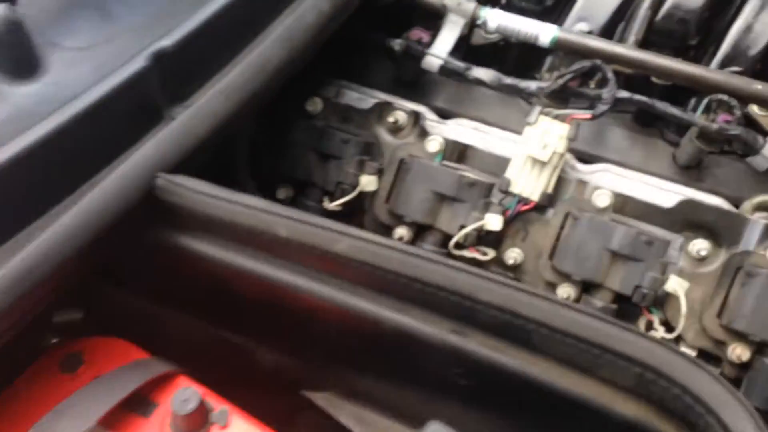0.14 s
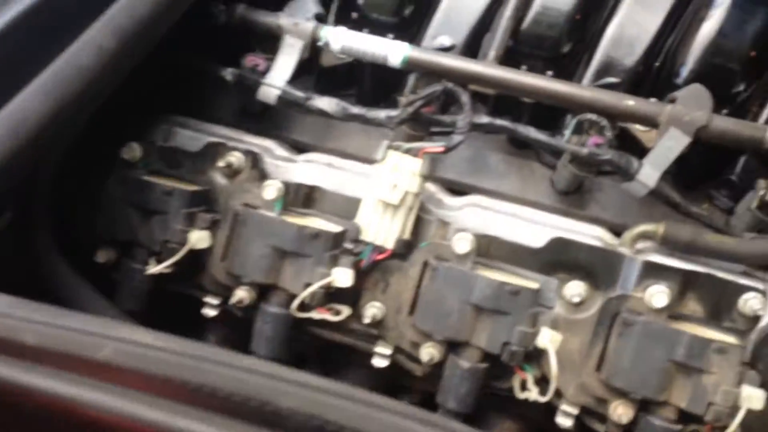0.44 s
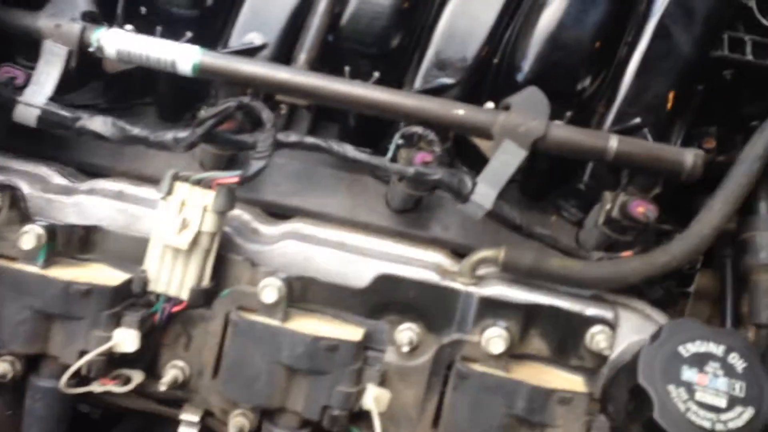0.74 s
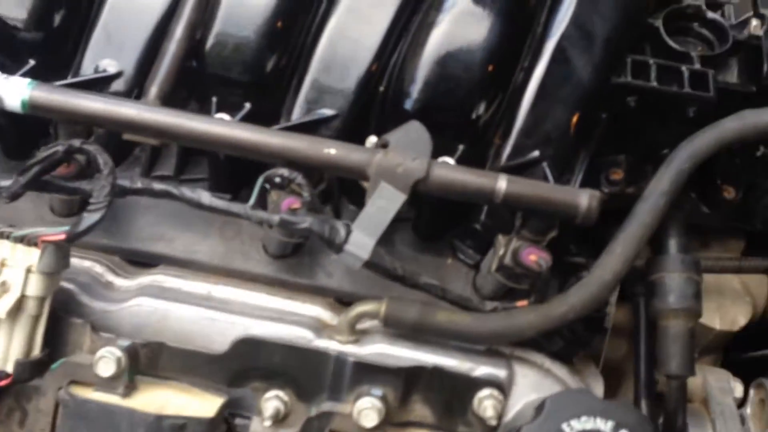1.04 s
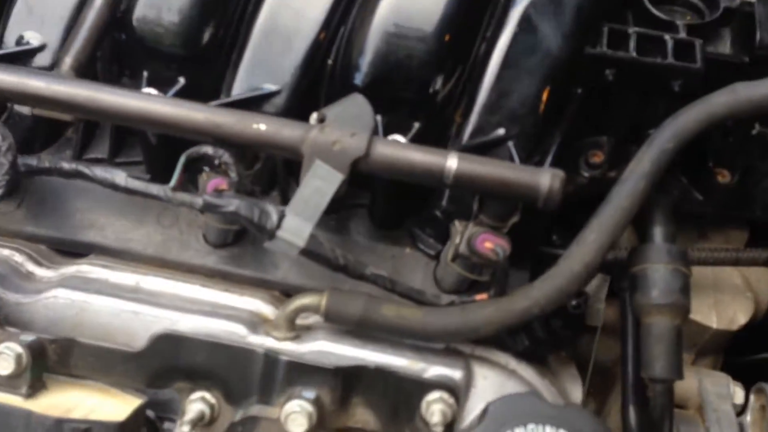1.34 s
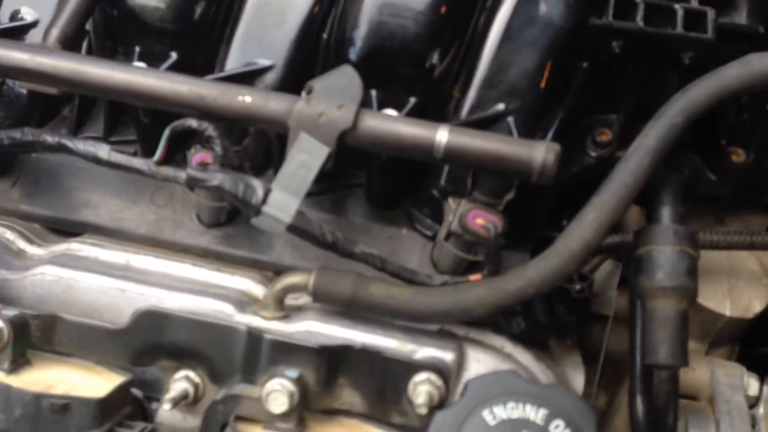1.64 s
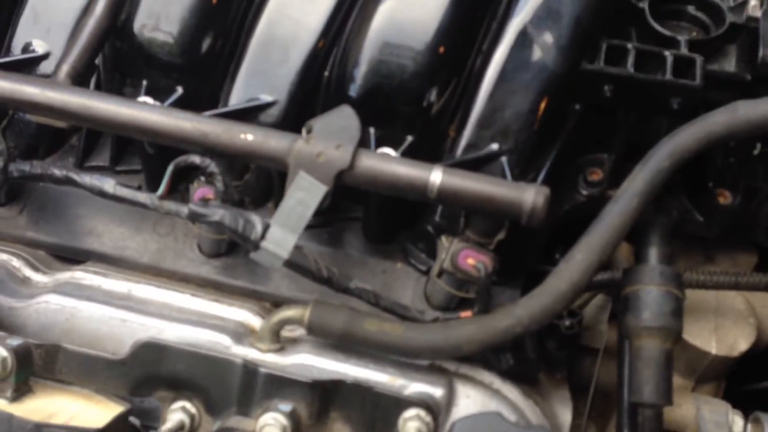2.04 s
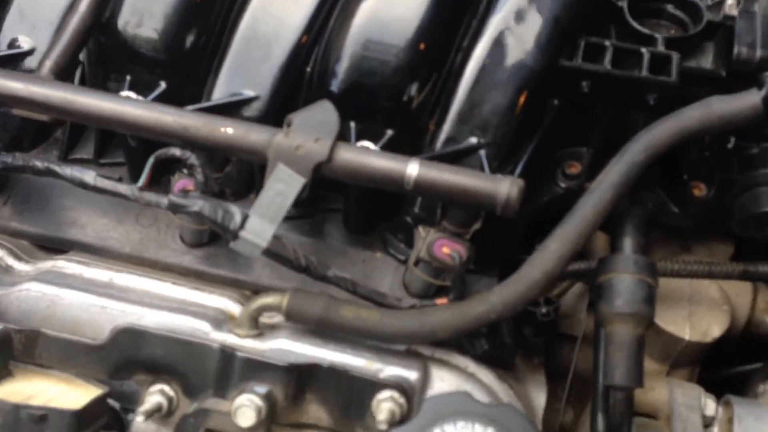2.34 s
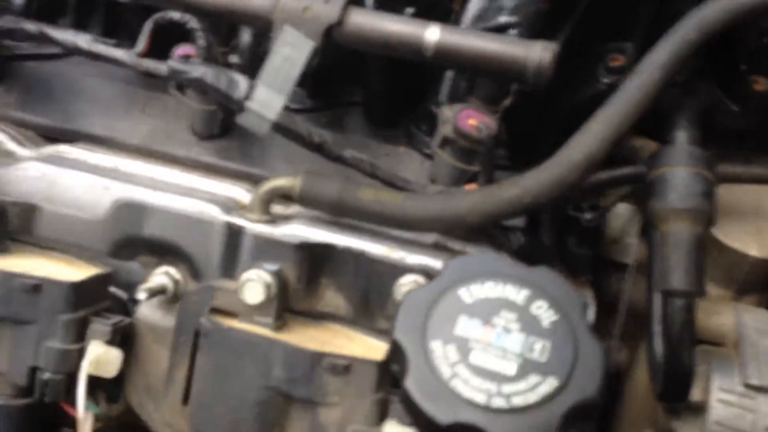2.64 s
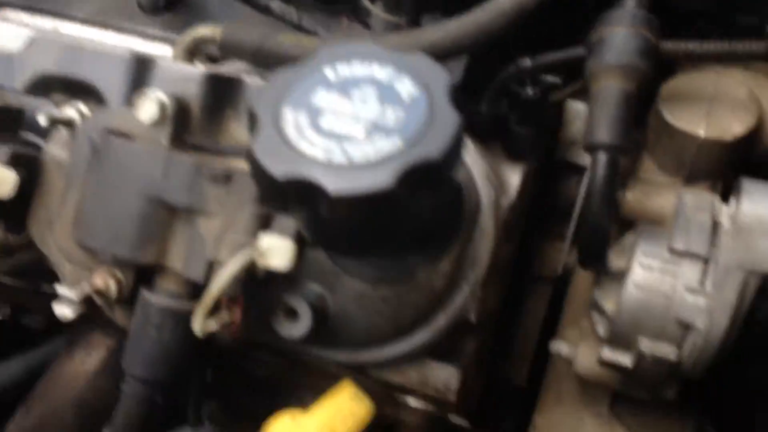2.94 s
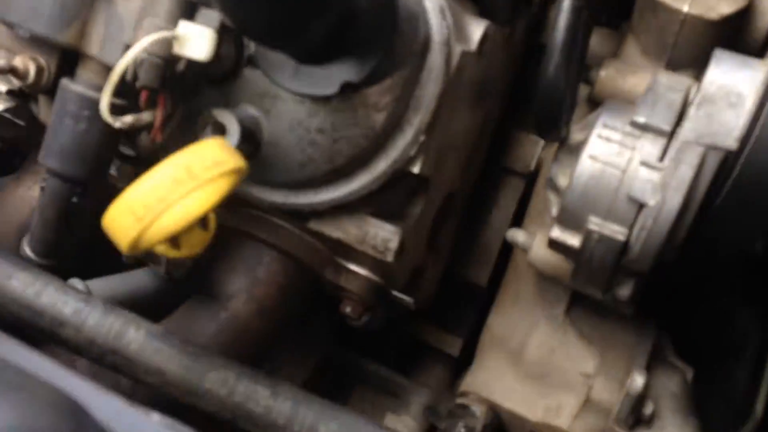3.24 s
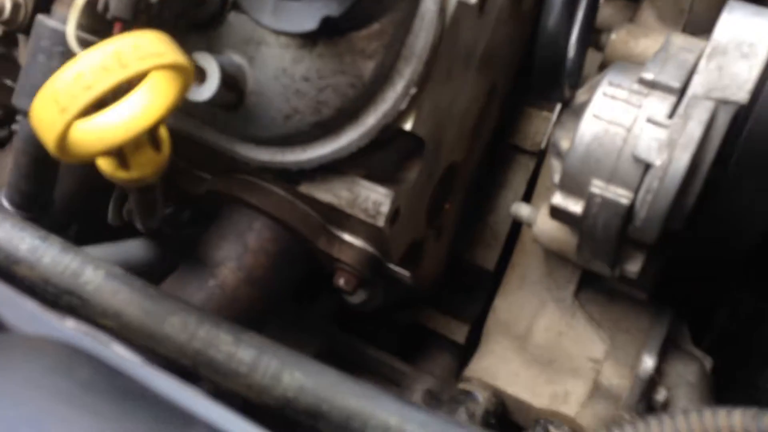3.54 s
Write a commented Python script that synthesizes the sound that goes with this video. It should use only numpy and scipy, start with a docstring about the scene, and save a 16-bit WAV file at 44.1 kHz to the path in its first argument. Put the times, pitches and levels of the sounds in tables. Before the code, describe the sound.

Idling engine heard close up in an open engine bay: bright, rattling lifter knocks repeat evenly throughout, with fainter hollow tocks, soft valve ticks, airy hiss and an uneven low rumble beneath.

```python
"""At an open bonnet, an eight-cylinder petrol engine idles while a hand-held microphone wanders along one bank.
Uneven firings, eight to a cycle, ring the exhaust and intake, with a few heavy thumps; three manifold
resonances swell once a cycle. Bands of noise make the clatter, hiss and leaking air; short bursts are valve ticks.
Once per engine cycle a loose valve lifter knocks and rebounds, ringing the cylinder head, and a hollow tock,
a fading sine, slips slowly ahead of it."""
import sys
import numpy as np
from scipy import signal
from scipy.io import wavfile

SR = 44100
rng = np.random.default_rng(int(sys.argv[2]) if len(sys.argv) > 2 else 0)


def volts_from_db(level):
    """Convert decibel levels to linear amplitude ratios."""
    exponent = np.asarray(level, float) / 20
    return 10 ** exponent


def dump(signal):
    """Clip the signal to [-1, 1] and save it as 16-bit WAV at the path in sys.argv[1]."""
    limited = np.clip(np.atleast_2d(signal).T, -1, 1)
    pcm = np.round(limited * 32767).astype(np.int16)
    wavfile.write(sys.argv[1], SR, pcm)


N = 162288


def rms_one(x):
    """Scale to an average strength (rms) of 1."""
    return x / np.sqrt(np.mean(x ** 2) + 1e-20)


def in_time(rows):
    """Join the points of a table with straight lines, one value per sample for each column."""
    s, *columns = np.transpose(rows)
    return [np.interp(np.arange(N) / SR, s, c) for c in columns]


def drift(rate_hz):
    """Slow random wandering of spread 1: noise smoothed twice, made at every 40th sample."""
    r = np.exp(-80 * np.pi * rate_hz / SR)
    noise = rng.standard_normal(N // 40 + 2002)
    slow = signal.lfilter([1], [1, -2 * r, r * r], noise)[2000:]  # skip the settling of the filter
    return np.interp(np.arange(N) / 40, np.arange(len(slow)), rms_one(slow))


def ring(clicks, hz, t60):
    """A struck part: a click of size 1 starts a sine that falls by 60 dB in t60 seconds."""
    r, w = 1000 ** (-1 / (t60 * SR)), 2 * np.pi * hz / SR
    return signal.lfilter([0, np.sin(w)], [1, -2 * r * np.cos(w), r * r], clicks + 1e-18)


def resonate(x, hz, width_hz):
    """A resonance passes sound near its own pitch, with a gain of 1 at the top."""
    r = np.exp(-np.pi * width_hz / SR)
    return signal.lfilter([(1 - r * r) / 2, 0, (r * r - 1) / 2],
                          [1, -2 * r * np.cos(2 * np.pi * hz / SR), r * r], x)


def train(s, size):
    """Clicks of given sizes at given times."""
    out, i = np.zeros(N), (np.asarray(s) * SR).astype(int)
    inside = (i >= 0) & (i < N)
    np.add.at(out, i[inside], (size * np.ones(len(i)))[inside])
    return out


def dying(clicks, t60):
    """Each click opens an envelope that falls by 60 dB in t60 seconds."""
    return signal.lfilter([1], [1, -1000 ** (-1 / (t60 * SR))], clicks + 1e-18)


def coloured(spectrum, patchy_db):
    """Noise in roughly third-octave bands that flicker partly together, partly alone; rms 1."""
    hz, db = np.transpose(spectrum)
    edges = np.geomspace(hz[0], hz[-1], int(3 * np.log2(hz[-1] / hz[0])) + 1)
    white, together = rng.standard_normal((2, N)), drift(1.18)
    out = 0
    for k, band in enumerate(zip(edges, edges[1:])):
        flicker_db = patchy_db * (0.9 * together + drift(14.0))
        level_db = np.interp(np.log(band).mean(), np.log(hz), db) + flicker_db
        band_filter = signal.butter(2, band, "band", fs=SR, output="sos")
        out = out + volts_from_db(level_db) * signal.sosfilt(band_filter, white[k % 2])  # neighbours use separate noise
    return rms_one(out)


def cycles():
    """Start, limited length and true end of each engine cycle, timed by the knocks."""
    knock_s = np.array(LIFTER_KNOCKS)[:, 0]
    usual_s = np.median(np.diff(knock_s))
    start = np.r_[knock_s[0] - usual_s, knock_s]  # one cycle before the first knock
    gap = np.diff(start, append=start[-1] + usual_s)
    return start, np.clip(gap, .119, .126), start + gap


def firing_times():
    """Eight evenly spaced firings a cycle, and whether each falls before the next cycle's firings."""
    first_share = 0.06064  # of the cycle, after the knock
    start, length, end = cycles()
    s = start[:, None] + length[:, None] * (first_share + np.arange(8) / 8)
    return s, s < end[:, None] + first_share * length[:, None]


def firings(cylinders_db, pipes, rough):
    """Uneven pulses plus turbulence pass twice through each pipe resonance; rms 1."""
    spread_db, jitter_s = 2.0, .0005
    s, fires = firing_times()
    luck = rng.standard_normal((*s.shape, 2))
    size = volts_from_db(np.array(cylinders_db) + spread_db * luck[..., 1]) * fires
    pulses = rms_one(train((s + jitter_s * luck[..., 0]).ravel(), size.ravel()))
    force = pulses + rough * rng.standard_normal(N)
    out = 0
    for k, (hz, width_hz, db) in enumerate(pipes):
        pipe = resonate(resonate(force, hz, width_hz), hz, 2 * width_hz)
        out = out + volts_from_db(db) * (-1) ** k * rms_one(pipe)  # pipes alternate in sign
    return rms_one(out)


# exhaust loudness over time: time_s, level_db
EXHAUST_LEVEL = [(0.0, -1), (0.11, -26.5), (0.13, -9), (0.19, -15), (0.23, -7.5), (0.27, -20), (0.38, -13),
                 (0.45, -30), (0.47, -18.5), (0.57, -9.5), (0.66, -21), (0.78, -13), (0.87, -19.5),
                 (0.95, -15.5), (1.18, -25.5), (1.21, -16), (1.4, -21), (1.42, -28), (1.5, -7.5),
                 (1.54, -25), (1.64, -25), (1.68, -17.5), (1.93, -21), (1.99, -12), (2.02, -26.5),
                 (2.14, -16.5), (2.18, -28.5), (2.3, -20.5), (2.53, -21), (2.57, -21.5), (2.86, -26),
                 (2.94, -20), (3.43, -26.5), (3.46, -20.5), (3.66, -23), (3.68, -35)]
# strength of the eight cylinders in firing order, starting after the knock: level_db
EXHAUST_CYLINDERS = [-1, 4, -1, 6, 3, -2.5, 2.5, 2.5]
# exhaust pipe resonances: pitch_hz, width_hz (of the first pass), level_db
EXHAUST_PIPES = [(70.8, 20.4, 6), (86.4, 34.1, 2.5), (128.4, 19.5, -5.5)]


def exhaust():
    """Firing pulses ring the exhaust pipes, over a deep rumble of noise near 43 Hz."""
    pulses = firings(EXHAUST_CYLINDERS, EXHAUST_PIPES, rough=.35)
    rumble = volts_from_db(-15) * rms_one(resonate(rng.standard_normal(N), 43.4, 16))
    return volts_from_db(in_time(EXHAUST_LEVEL)[0]) * (pulses + rumble)


# intake boom over time: time_s, level_db
INTAKE_LEVEL = [(0.0, -24.5), (0.36, -25.5), (0.44, -32), (0.6, -26.5), (0.86, -28.5), (0.93, -28),
                (1.2, -30), (1.5, -31.5), (1.81, -29), (1.9, -33.5), (2.24, -36), (2.87, -41), (2.9, -26),
                (2.96, -35), (3.32, -34), (3.68, -26.5)]
# strength of the eight cylinders at the intake, in firing order: level_db
INTAKE_CYLINDERS = [-2, 0, -1, 1, 6, 1, -3, -2]
# intake pipe resonances: pitch_hz, width_hz (of the first pass), level_db
INTAKE_RESONANCES = [(266.1, 12, -0.5), (323.8, 37, -5)]


def intake():
    """The same firings boom in the higher resonances of the intake."""
    return volts_from_db(in_time(INTAKE_LEVEL)[0]) * firings(INTAKE_CYLINDERS, INTAKE_RESONANCES, rough=.5)


# manifold resonances: pitch_hz, width_hz (of the first pass), loudest_share of the cycle,
# swing_db (before a soft limit trims it)
MANIFOLD_MODES = [(826, 28, 0.27, 5), (1195, 90, .8, 2), (2400, 400, 0.7, 2)]
# how loud each resonance reaches the moving microphone: time_s, first_db, second_db, third_db
MANIFOLD_LEVELS = [(0.0, -43, -39, -36), (0.29, -35.5, -33.5, -48), (0.55, -53, -33, -32),
                   (0.851, -32, -28.5, -32), (1.05, -47, -39, -39.5), (1.209, -39, -33, -34),
                   (1.37, -32, -36, -36.5), (1.61, -30, -41, -35), (2.09, -38, -39.5, -35.5),
                   (2.45, -31, -31.5, -33), (2.66, -33, -41, -37.5), (2.93, -34.5, -37, -35.5),
                   (3.24, -37, -39, -37), (3.68, -33.5, -29, -28)]


def manifold():
    """Equal parts of flow noise and uneven firing blows, in resonances that swing with the cam."""
    start, length, _ = cycles()
    t = np.arange(N) / SR
    k = np.clip(np.searchsorted(start, t) - 1, 0, None)
    turn = (t - start[k]) / length[k]  # share of the cycle gone by
    s, fires = firing_times()
    out = 0
    for (hz, width_hz, share, swing_db), db in zip(MANIFOLD_MODES, in_time(MANIFOLD_LEVELS)):
        luck = rng.standard_normal((*s.shape, 2))
        blows = rms_one(train((s + 0.00202 * luck[..., 0]).ravel(), (fires * luck[..., 1]).ravel()))
        force = blows + rng.standard_normal(N)
        level_db = db + swing_db * np.tanh(1.6 * np.cos(2 * np.pi * (turn - share)))
        tone = resonate(resonate(force, hz, width_hz), hz, 1.93 * width_hz)
        out = out + volts_from_db(level_db) * rms_one(tone)
    return out


def chatter():
    """Loudness of the mechanical bed: steady, plus a small jolt with every firing; rms 1."""
    share, t60_s, spread_db = 0.85, 0.018, 5
    s, fires = firing_times()
    luck = rng.standard_normal((*s.shape, 2))
    size = fires * volts_from_db(spread_db * luck[..., 1])
    jolts = train((s + 0.0022 * luck[..., 0]).ravel(), size.ravel())
    return rms_one(1 + share * dying(jolts, t60_s))


# nearness of the microphone: time_s, clatter_db, hiss_db (before the hiss trim)
MIC_NEARNESS = [(0.0, -25.5, -30.5), (0.11, -26.5, -29), (0.6, -27.5, -32), (0.83, -24.5, -29),
                (1.05, -27.5, -33.5), (1.23, -27, -31.5), (1.37, -26.5, -33), (1.69, -22.5, -31),
                (1.94, -27.5, -33.5), (2.08, -28.5, -34.5), (2.39, -24, -31.5), (2.89, -29, -33.5),
                (3.4, -26, -34.5), (3.55, -24, -31.5), (3.68, -25, -34)]
# colour of the clatter noise: pitch_hz, level_db (per Hz, relative)
CLATTER_COLOUR = [(88, -38), (150, 2), (209, -16), (274, 0.5), (392, -16), (706, -4), (813, -2),
                  (1020, 1.5), (1210, -13.5), (1370, -4.5), (3200, -14), (4160, -21), (7040, -120)]
# colour of the hiss: pitch_hz, level_db (per Hz, relative)
HISS_COLOUR = [(1650, -47), (2800, -21), (3500, -2), (4800, 1), (6200, -1), (8500, -15), (11000, -42),
               (18700, -120)]


def clatter_and_hiss():
    """Valve gear, belts and fan as two flickering noises, both pulsing with the firings."""
    clatter_db, hiss_db = in_time(MIC_NEARNESS)
    hiss_trim_db = 1
    clatter = volts_from_db(clatter_db) * coloured(CLATTER_COLOUR, patchy_db=2.5)
    hiss = volts_from_db(hiss_db + hiss_trim_db) * coloured(HISS_COLOUR, patchy_db=2.0)
    return chatter() * (clatter + hiss)


# steady part of the leaking air: time_s, level_db
AIR_LEVEL = [(0, -38), (.16, -34.5), (.45, -39), (.54, -34), (.62, -36.5), (.77, -35.5), (.98, -38),
             (1.1, -39), (1.25, -37.5), (1.36, -44.5), (1.47, -32), (1.6, -41.5), (1.68, -36), (1.88, -38),
             (1.99, -43), (2.1, -37.5), (2.2, -41.5), (2.4, -38.5), (2.69, -38.5), (2.82, -43),
             (2.98, -32.5), (3.06, -43), (3.2, -36.5), (3.41, -40), (3.5, -37), (3.68, -39.5)]
# colour of the air: pitch_hz, level_db (per Hz, relative)
LEAK_COLOUR = [(7500, -3.5), (9000, 3.5), (11000, -0.5), (13000, -3.5), (16500, -6)]
# short puffs of that air: start_s, level_db (before the puff trim)
AIR_PUFFS = [(0.1326, -28), (0.2359, -19), (0.3094, -24), (0.3396, -23), (0.5057, -27), (0.5536, -23),
             (0.7457, -19), (0.837, -21), (0.9443, -22), (1.1837, -22), (1.2794, -16), (1.4394, -18),
             (1.5194, -18), (1.711, -30), (1.92, -20), (2.1594, -31), (2.5242, -24), (2.9218, -21),
             (3.1198, -32)]


def air():
    """Air leaking at the intake: thin, high noise that swells at random and puffs."""
    swell_db, swell_hz = 1.5, 17
    puff_trim_db, rise_t60_s, fall_t60_s = -6, 0.011, 0.045
    s, db = np.transpose(AIR_PUFFS)
    clicks = train(s, volts_from_db(db + puff_trim_db))
    puffs = dying(clicks, fall_t60_s) - dying(clicks, rise_t60_s)  # the difference starts softly
    steady = volts_from_db(in_time(AIR_LEVEL)[0] + swell_db * drift(swell_hz))
    return (steady + puffs) * coloured(LEAK_COLOUR, patchy_db=0.5)


# lighter valve ticks in every cycle: cycle_share after the knock, level_db, t60_s
VALVE_TICKS = [(.4, -51.5, 0.047), (.63, -28, 0.055), (.8, -39, 0.046)]
# colour of the ticks, also of the tail of the knock: pitch_hz, level_db (per Hz, relative)
TICK_COLOUR = [(900, -20), (1300, 3), (2500, 4.5), (4500, -3), (7000, -6), (10000, -8)]


def valves():
    """Soft noise bursts near fixed places in the cycle, louder as the microphone comes near."""
    spread_db, jitter_s = 2.5, 0.0031
    start, length, _ = cycles()
    luck = rng.standard_normal((len(start), len(VALVE_TICKS), 2))
    bursts = 0
    for k, (share, db, t60) in enumerate(VALVE_TICKS):
        s = start + share * length + jitter_s * luck[:, k, 0]
        bursts = bursts + dying(train(s, volts_from_db(db + spread_db * luck[:, k, 1])), t60)
    near_db = in_time(MIC_NEARNESS)[0]
    return volts_from_db(near_db - near_db.mean()) * bursts * coloured(TICK_COLOUR, patchy_db=3.0)


# hollow tocks, slightly faster than the knocks, perhaps from the belt drive: start_s, level_db (before the trim)
HOLLOW_TOCKS = [(0.028, -22), (0.149, -15), (.269, -15.5), (.388, -18), (0.511, -16), (.630, -23),
                (0.755, -13), (.882, -21), (0.995, -18), (1.475, -20.5), (1.595, -22), (1.717, -17),
                (1.837, -33), (1.955, -22), (2.077, -18.5), (2.205, -24), (2.318, -19), (2.440, -36),
                (2.564, -17), (2.807, -23), (2.930, -18), (3.179, -23), (3.516, -17.5), (3.649, -21)]


def tocks():
    """Each tock is a short soft-edged ring, its pitch a little different every time."""
    pitch_hz, pitch_spread, t60_s, rise_s, trim_db = 1165, 0.031, 0.049, 0.0013, 3
    out, t = np.zeros(N + SR), np.arange(SR // 10) / SR
    shape = 1000 ** (-t / t60_s) * (1 - np.exp(-t / rise_s))
    for (s, db), luck in zip(HOLLOW_TOCKS, rng.standard_normal(len(HOLLOW_TOCKS))):
        i = int(s * SR)
        tone = np.sin(2 * np.pi * pitch_hz * (1 + pitch_spread * luck) * t)
        out[i:i + len(t)] += volts_from_db(db + trim_db) * shape * tone
    return out[:N]


# lifter knocks: start_s, level_db (before the trims), low_ring_db (relative, before its trim),
# low_ring_pitch_hz, rebound_db (relative to the hit)
LIFTER_KNOCKS = [(0.0428, -8.5, -25, 1800, 8), (0.1651, -5.5, -20, 1370, -2), (0.285, -8.5, -9, 1490, -20),
                 (0.406, -4.5, -12, 1860, -2), (0.529, -20, -5, 1580, -5), (0.653, -3, -15.5, 1670, -0.5),
                 (0.7732, -6.5, -8, 1660, -3), (0.8969, -3.5, -18, 1420, -4), (1.0191, -5, -9, 1700, -3.5),
                 (1.1419, -6.5, -29, 1950, 3.5), (1.26, -3.5, -8, 1550, -9), (1.3832, -4.5, -9, 1470, -7),
                 (1.505, -7, -17, 1830, 1), (1.628, -4.5, -9.5, 1840, -2), (1.7485, -4, -13, 1780, -22),
                 (1.8703, -4, -4.5, 1690, -11), (1.9895, -9.5, -5, 1770, -12), (2.1144, -4.5, -5, 1740, -3),
                 (2.2403, -5.5, -8, 1680, -4), (2.361, -5.5, -7, 1830, -0.5), (2.4844, -6, -4.5, 1850, -7),
                 (2.609, -5, -7, 1810, -33), (2.7304, -5, -8, 1730, -18), (2.8524, -5, -7.5, 1760, -17),
                 (2.9769, -5, -7, 1640, -7), (3.0965, -15.5, 1, 1660, -2), (3.2242, -3, -6, 1680, -9),
                 (3.3497, -4, -7.5, 1690, -9), (3.4488, -4.5, -6.5, 1750, -8), (3.5731, -4.5, -20, 1660, 0)]
# ways the cylinder head rings: pitch_hz (on average), level_db (relative), t60_s
HEAD_MODES = [(1200, -15, 0.01), (2000, -4, 0.0024), (2570, -28, 0.0017), (3470, 2.5, 0.008),
              (4070, 0.5, 0.0087), (4620, -2.5, 0.01), (5590, -2, 0.0092), (6040, -1.5, 0.012),
              (6650, -0.5, 0.0055), (7900, -1, 0.0038), (9930, -6.5, 0.0039), (11400, -11, 0.004),
              (13500, -9, .004)]
# colour of the knock as the microphone moves: time_s, tilt_db per octave about the pivot, best_heard_hz
MIC_COLOUR = [(0, 1, 6140), (.2, 2, 6000), (.4, 2.5, 3670), (.65, -3, 6100), (.95, 1, 3720),
              (1.14, 0, 5860), (1.3, -5.5, 3940), (1.63, 0.5, 4660), (1.902, 2, 3600), (2.15, 3.5, 5150),
              (2.5, 3.5, 4500), (2.95, -4, 3950), (3.2, 1, 6100), (3.45, -1, 7600), (3.68, 3, 7000)]


def knocks():
    """Hit, rebound and grainy rattle ring the head, anew each time; low ring, thud and tail join in."""
    head_db, head_spread_db, pitch_spread = -12.5, 1.5, 0.038
    pivot_hz, focus_db, focus_octaves = 4500, 4.5, .45
    rebound_s, rebound_treble_db = .0063, 1  # the treble gain is per octave above the pivot
    rattle_t60_s, grains_per_s, contact_s = 0.022, 5000, 0.00056
    low_t60_s, low_trim_db = 0.02, 5
    s, db, low_db, low_hz, rebound_db = np.transpose(LIFTER_KNOCKS)
    luck = rng.standard_normal((len(s), len(HEAD_MODES) + 1, 3))
    lag = np.clip(rebound_s + 0.0013 * luck[:, -1, 0], .002, None)
    at, tilt_db, focus_hz = np.transpose(MIC_COLOUR)
    tilt_db, focus_hz = np.interp(s, at, tilt_db), np.interp(s, at, focus_hz)
    t = np.arange(SR // 10) / SR
    out = np.zeros(N + 2 * len(t))
    fade = 1000 ** (-t / rattle_t60_s) * (1 - np.exp(-t / (2 * contact_s)))
    low_shape = 1000 ** (-t / low_t60_s) * (1 - np.exp(-t / contact_s))
    for j, i in enumerate((s * SR).astype(int)):
        back = int(lag[j] * SR)
        late_fade = np.r_[np.zeros(back), fade[:-back]]
        grains = (rng.random(len(t)) < grains_per_s / SR) * rng.standard_normal(len(t)) * 0.51
        for k, (hz, mode_db, t60) in enumerate(HEAD_MODES):
            up = np.log2(hz / pivot_hz)  # octaves above the pivot
            near_db = focus_db * np.exp(-(np.log2(hz / focus_hz[j]) / focus_octaves) ** 2)
            second_db = rebound_db[j] + rebound_treble_db * max(up, 0)
            first, second = volts_from_db(head_spread_db * luck[j, k, :2] + [0, second_db])
            # each mode gets the same grains, shifted in time
            force = np.roll(grains, 97 * k) * (first * fade + second * late_fade)
            force[[0, back]] += 1.15 * first, 0.7 * second
            size = (-1) ** k * volts_from_db(db[j] + head_db + mode_db + tilt_db[j] * up + near_db)
            out[i:i + len(t)] += size * ring(force, hz * (1 + pitch_spread * luck[j, k, 2]), t60)
        tone = volts_from_db(db[j] + low_db[j] + low_trim_db) * np.sin(2 * np.pi * low_hz[j] * t) * low_shape
        out[i:i + len(t)] += tone
        out[i + back:i + back + len(t)] += 1.13 * volts_from_db(rebound_db[j]) * tone
    # dull thud of the engine block
    thud = ring(train(s, volts_from_db(db - 13.5 + luck[:, -1, 1])), hz=550, t60=0.06)
    tail = train(s, volts_from_db(db - 13))
    tail_shape = dying(tail, 0.11) - dying(tail, .006)
    return out[:N] + thud + tail_shape * coloured(TICK_COLOUR, patchy_db=1.2)


# heavy firings: start_s, level_db (before the trim)
HEAVY_FIRINGS = [(0.22, -14), (0.569, -22), (1.49, -6), (1.981, -3)]


def thumps():
    """A heavy firing: a soft push that rings for a swing or two."""
    pitch_hz, t60_s, trim_db = 76.6, 0.03, 4
    s, db = np.transpose(HEAVY_FIRINGS)
    push = signal.lfilter([.01], [1, -.99], train(s, volts_from_db(db + trim_db)))
    return ring(push, pitch_hz, t60_s)


def scene():
    """All sources added together at one microphone."""
    engine = exhaust() + intake() + manifold() + clatter_and_hiss() + air()
    return (engine + valves() + tocks() + knocks() + thumps())[None]


def roll_off(x):
    """The treble ends steeply here."""
    return signal.sosfilt(signal.butter(12, 16410, fs=SR, output="sos"), x)


def record(dry):
    """The deepest bass is lost, peaks are rounded and the top is cut."""
    bass_limit_hz, treble_limit_hz = 43.7, 15350
    bass_cut = signal.butter(2, bass_limit_hz, "high", fs=SR, output="sos")
    rounded = 0.89 * np.tanh(signal.sosfilt(bass_cut, dry) / 0.93)
    top_cut = signal.ellip(10, .5, 50, treble_limit_hz, fs=SR, output="sos")
    return roll_off(signal.sosfilt(top_cut, rounded))


dry = scene()
out = record(dry)
dump(out)
```